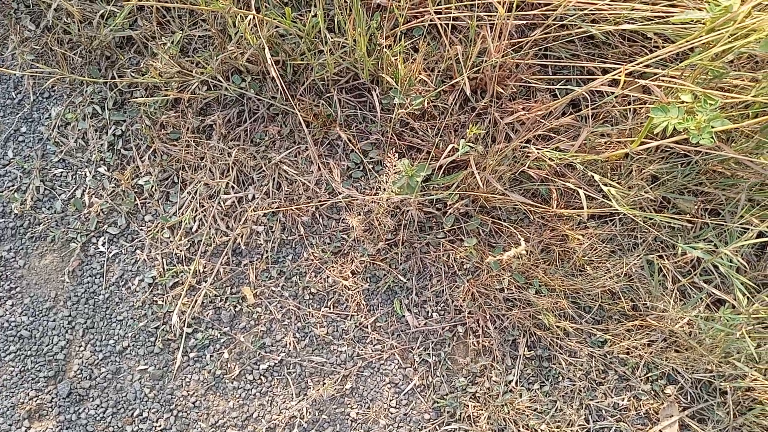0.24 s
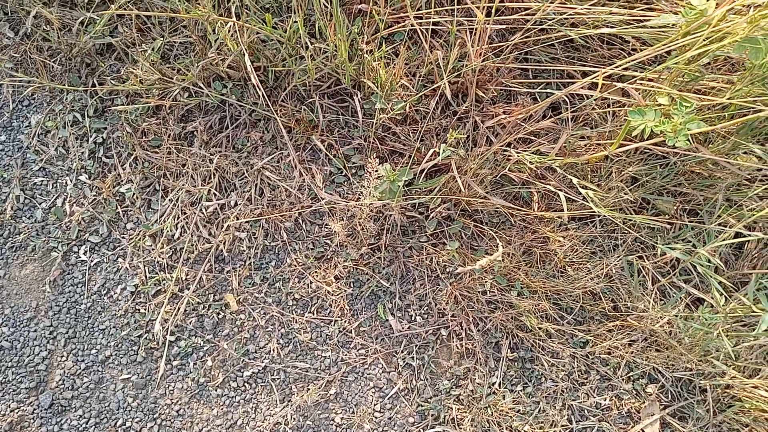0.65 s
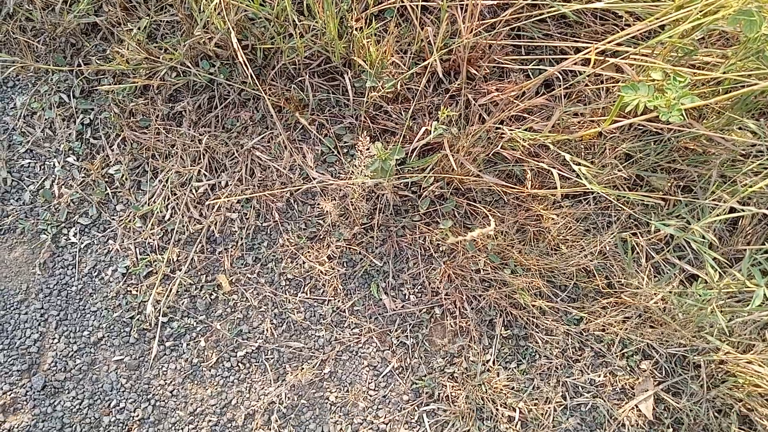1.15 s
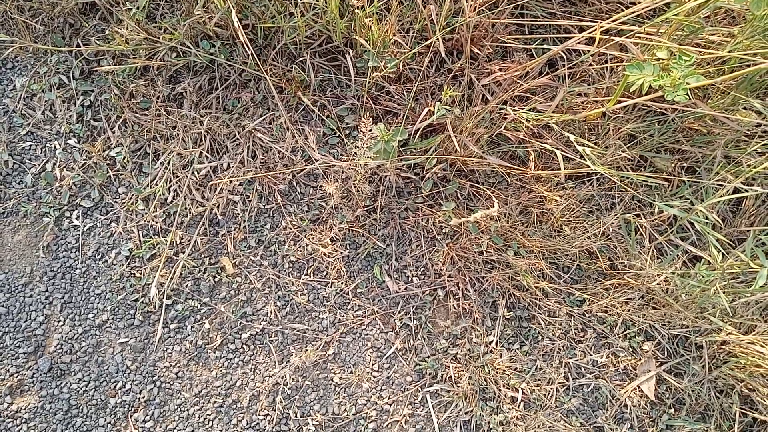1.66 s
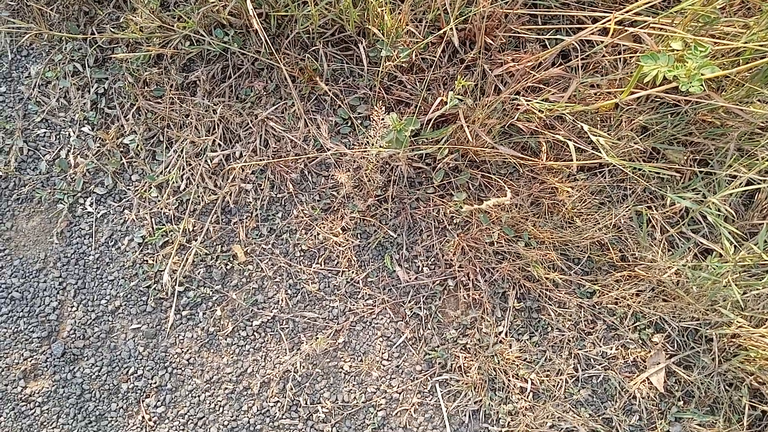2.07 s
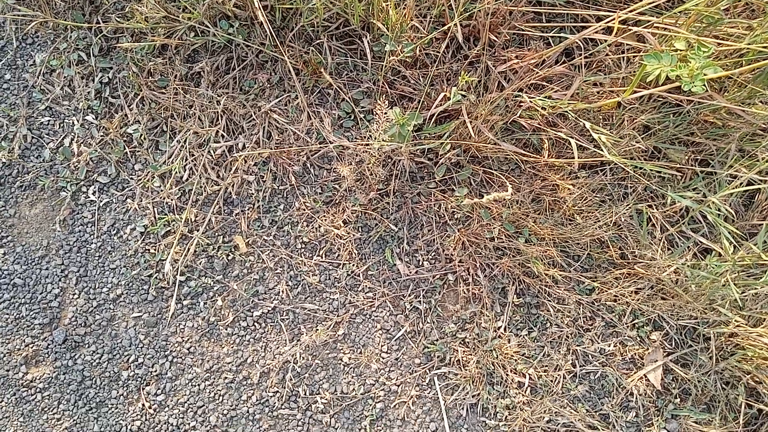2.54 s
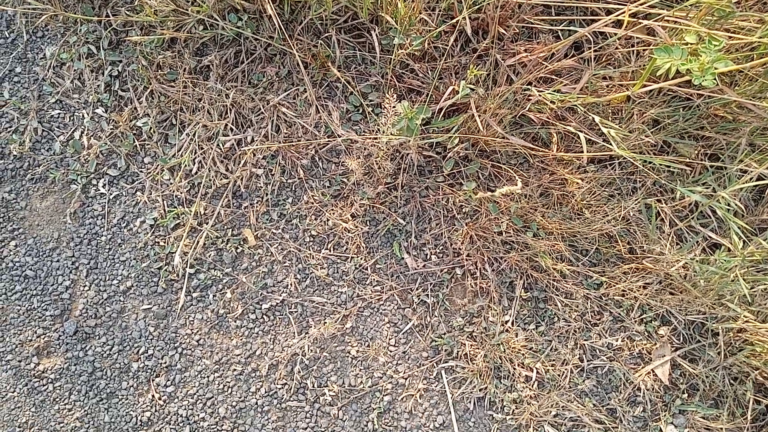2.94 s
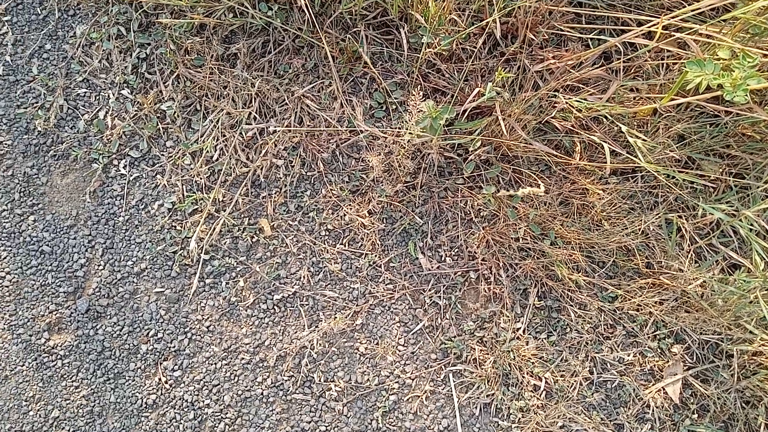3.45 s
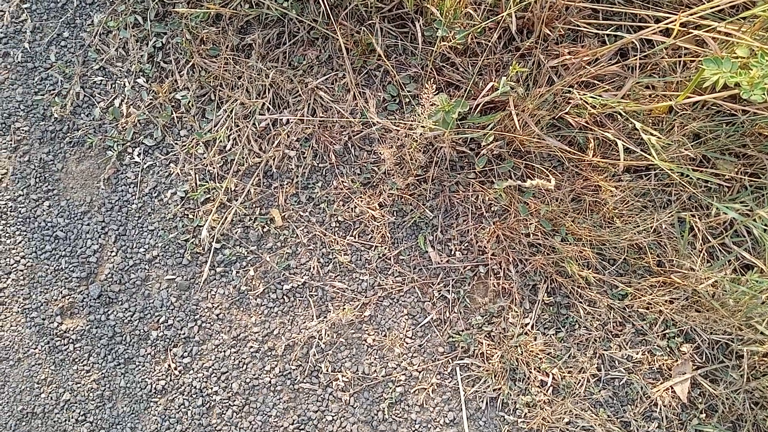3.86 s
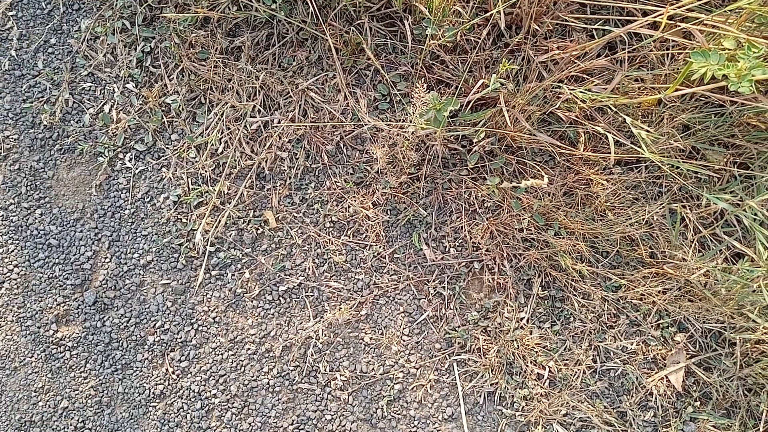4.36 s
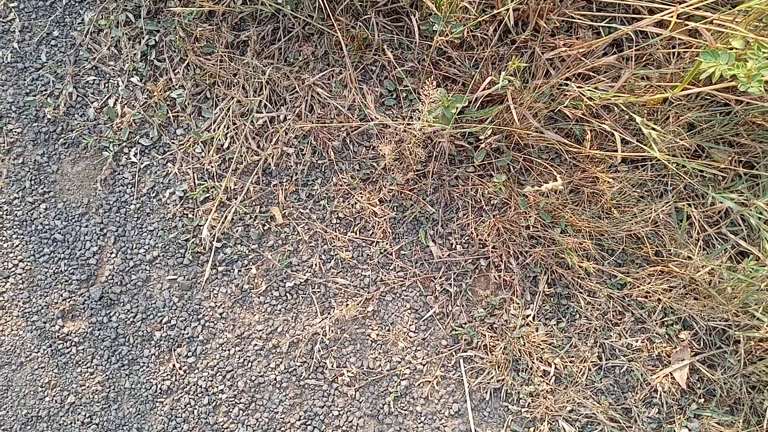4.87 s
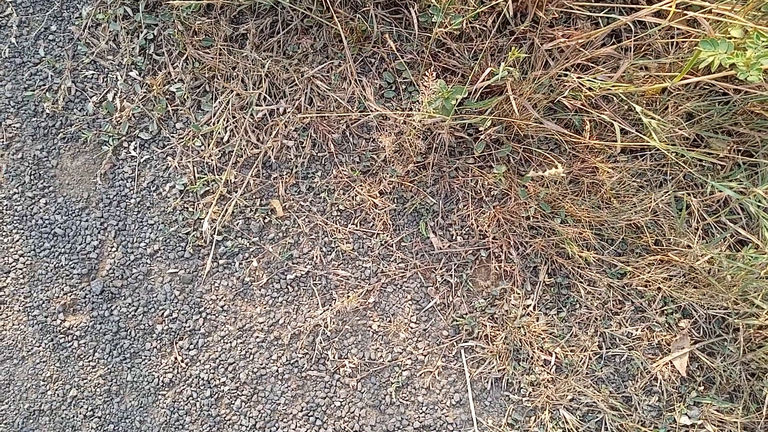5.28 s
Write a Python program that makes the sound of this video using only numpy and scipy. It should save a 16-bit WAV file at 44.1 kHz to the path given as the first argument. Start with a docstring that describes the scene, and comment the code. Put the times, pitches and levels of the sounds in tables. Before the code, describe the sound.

A hollow plastic jar snaps, knocks and clatters close by while shoes crunch gravel and dry grass outdoors, insects buzzing faintly behind.

```python
"""Gravel verge: a plastic jar is handled and set down close by; its walls snap and knock.
Each blow is a noise burst ringing resonances, with a faint scattered tail. Shoes scuff on gravel and
dry grass and a hand rubs the plastic: coloured slip grains under swells. Soft hiss and stray ticks join.
Behind: an insect buzz of rising chirps, bird chips of gliding sines, a thin wavering far whine,
and coloured noise for the low far rumble and outdoor wash."""
import sys
import numpy as np
from scipy import signal
from scipy.fft import rfft, irfft
from scipy.io import wavfile
from scipy.ndimage import uniform_filter1d

SR = 44100
rng = np.random.default_rng(int(sys.argv[2]) if len(sys.argv) > 2 else 0)


def output_pcm(signal):
    """Save a mono or channel-first signal as 16-bit PCM at the path in sys.argv[1].

    Samples are clipped to [-1, 1] before scaling.
    """
    pcm = np.clip(np.atleast_2d(signal).T, -1, 1) * 32767
    wavfile.write(sys.argv[1], SR, np.round(pcm).astype(np.int16))


N = 242991
TIME = np.arange(N) / SR  # s

# colour of grit slipping and ticking: (frequency [Hz], relative density [dB per Hz])
GRIT_COLOUR = [(300, -26), (550, -40), (780, -7), (1000, -0.5), (1280, -6), (1900, -1.5), (2400, 1),
               (3000, -1.5), (3500, -5), (4050, -12), (5000, -15.5), (6000, -12.5), (7200, -28),
               (10000, -58)]
# colour of fine hiss off the palm: (frequency [Hz], relative density [dB per Hz])
PALM_HISS_COLOUR = [(3000, -6.5), (5000, 5.5), (7200, -1.5), (9800, 1), (12000, -1), (14500, -2),
                    (16500, 1.5)]


def amp(db):
    """Decibels to amplitude factor."""
    return 10 ** (np.asarray(db) / 20)


def unit(x):
    """Scale to rms 1."""
    return x / np.sqrt(np.mean(x ** 2) + 1e-20)


def add(mix, start_s, sound):
    """Mix sound in place at start_s, cut at the end of mix."""
    part = mix[max(round(start_s * SR), 0):][:len(sound)]
    part += sound[:len(part)]


def colour(x, points):
    """Filter x by (Hz, dB) points, interpolated over log frequency; rms 1."""
    point_hz, point_db = np.transpose(points)
    hz = np.fft.rfftfreq(len(x), 1 / SR)
    gain = amp(np.interp(np.log(hz + 1), np.log(point_hz), point_db))
    return unit(irfft(rfft(x) * gain, len(x)))


def wander(per_s):
    """Random curve of rms 1: per_s new values a second, joined by straight lines."""
    return unit(np.interp(TIME * per_s, np.arange(8192), rng.standard_normal(8192)))


def band(x, edges_hz, order):
    """Causal Butterworth band-pass."""
    return signal.sosfilt(signal.butter(order, edges_hz, "bandpass", fs=SR, output="sos"), x)


def click(levels_db, spot_mode, slip_s, scatter_db=-15, scatter_s=0.01, kick=6.7):
    """A kick and a quick run of tiny slips excite the jar's walls; the ground scatters a short tail."""
    # thud, hollow body, crack, bright edge: (low edge [Hz], high edge [Hz])
    registers = [(150, 520), (740, 1500), (1700, 3850), (4100, 16000)]
    # broad and narrow jar resonances: (nominal frequency [Hz], gain over bare click [dB], t60 [s])
    jar_modes = [(214, 18.5, 0.13), (312, 5.5, 0.0087), (662, 16, 0.053), (880, 5, 0.027), (1040, 4, 0.012),
                 (1393, 3, 0.17), (1780, 7.5, 0.0099), (2080, 3.5, 0.019), (2386, 11, 0.005),
                 (2500, 1, 0.13), (2950, 7, 0.0053), (3300, 2, 0.041), (4160, 13, 0.036), (4440, 5, 0.017),
                 (5380, 18.5, 0.0024)]
    t = np.arange(8192) / SR
    slip_fade = np.exp(-t / slip_s)
    scatter_fade = amp(scatter_db) * np.exp(-t / scatter_s)
    push = rng.standard_normal(len(t)) * (slip_fade + scatter_fade)
    push[0] += kick

    ring = np.zeros(len(t))
    for hz, gain_db, t60_s in [*jar_modes, spot_mode]:
        fade = np.exp(-np.log(1000) * t / t60_s)
        detune = rng.uniform(.985, 1.015)  # the grip shifts each mode a little
        ring += amp(gain_db) * 2 * fade / fade.sum() * np.cos(2 * np.pi * hz * detune * t)
    sound = push + signal.fftconvolve(push, ring)[:len(t)]

    # where and how hard the wall is struck sets the share of each register
    blow = np.zeros(len(t))
    level_samples = round(.01 * SR)  # levels are rms over the first 10 ms
    for level_db, edges_hz in zip(levels_db, registers):
        part = band(sound, edges_hz, order=4)
        blow += amp(level_db) * part / np.std(part[:level_samples])
    return blow


def snaps(thud_db=-22.5, body_db=-12, slip_s=0.0027, spot_db=18, spot_t60_s=.015):
    """Wall snaps or stone cracks: too quick to move the hollow body much, so mostly crack and edge."""
    # (time [s], crack level [dB], bright edge over crack [dB], nominal ring of struck spot [Hz])
    snap_events = [(0.305, -50, -3.5, 2530), (0.424, -42.5, -16, 2400), (0.4865, -36.5, -4.5, 2430),
                   (0.5, -38.5, -1.5, 3730), (0.5495, -34, -13.5, 3550), (0.6908, -45.5, -0.5, 2880),
                   (0.7751, -41.5, -11.5, 2900), (0.8138, -45, -10, 2670), (0.8846, -49, -5, 2800),
                   (1.0246, -45.5, -2.5, 2630), (1.564, -19.5, -10, 2460), (1.5743, -18.5, -8, 2330),
                   (1.7955, -26, -8, 2680), (1.7995, -31.5, -12, 2270), (1.9125, -31.5, -33, 2340),
                   (1.932, -36, -24, 2630), (1.9719, -24, -5, 2120), (2.1004, -50, 4.5, 5800),
                   (2.9141, -48.5, -10, 3060), (3.083, -56, -20, 2600), (3.125, -49.5, -22, 2350),
                   (3.179, -49.5, -19, 2700), (3.208, -52, -18, 2530), (3.299, -47, -6, 2900),
                   (3.3566, -15.5, -18.5, 2290), (3.3934, -22.5, -10.5, 2600), (3.453, -35, -9, 2420),
                   (3.475, -37, -5, 2600), (3.514, -29.5, -12, 2770), (3.5286, -27, -10, 1550),
                   (3.824, -37.5, 2, 3430), (3.9022, -19.5, -17, 2070), (3.905, -11, -7.5, 2550),
                   (4.953, -29.5, -9.5, 2840)]
    out = np.zeros(N)
    for start_s, level_db, edge_db, spot_hz in snap_events:
        levels_db = level_db + np.array([thud_db, body_db, 0, edge_db])
        add(out, start_s, click(levels_db, (spot_hz, spot_db, spot_t60_s), slip_s))
    return out


def knocks(edge_over_crack_db=-18, slip_s=.0024, spot_db=24.5, spot_t60_s=0.032):
    """Duller knocks, with more hollow body and thud, set a larger panel ringing for longer."""
    # (time [s], body level [dB], thud over body [dB], crack over body [dB], nominal ring of spot [Hz])
    knock_events = [(0.3444, -50, -10, -2, 1050), (0.6254, -48, -4.5, -4.5, 1030),
                    (1.0238, -48, -18, -0.5, 1000), (1.066, -53, -5, 3.5, 970), (1.7003, -52, -2, 2, 810),
                    (2.0019, -26.5, -25, -4, 1070), (2.0638, -37.5, -1, 0.5, 1006),
                    (2.078, -42.5, -1, -2, 785), (2.4403, -47, 8.5, -3.5, 720),
                    (2.5734, -40.5, 0, -4.5, 760), (2.6716, -51, -14, -0.5, 960), (2.868, -47, 4, -10, 680),
                    (2.879, -52, 10, -8, 608), (3.2359, -38, -28, -2.5, 973), (3.2645, -41, -4, 1.5, 964),
                    (3.285, -38, -2.5, -3.5, 950), (3.3445, -33, -8, 1.5, 1900),
                    (3.3841, -39.5, 7.5, -17, 840), (3.5016, -28, -0.5, -10, 940),
                    (3.533, -26.5, -6.5, -10, 980), (3.718, -39, -17, 1.5, 840),
                    (3.823, -32.5, -13, -4, 750), (4.4605, -47.5, -24, -4, 1110),
                    (4.6647, -36, 1.5, 4, 980), (4.686, -38.5, -7, -1, 1030), (4.957, -36, 2.5, 0.5, 210)]
    out = np.zeros(N)
    for start_s, level_db, thud_db, crack_db, spot_hz in knock_events:
        levels_db = level_db + np.array([thud_db, 0, crack_db, crack_db + edge_over_crack_db])
        add(out, start_s, click(levels_db, (spot_hz, spot_db, spot_t60_s), slip_s))
    return out


def verge(x, level_db=-33.5, t60_s=.7, low_hz=500, high_hz=14000):
    """Ground and weeds scatter a faint tail: convolution with band-limited decaying noise."""
    t = np.arange(SR) / SR
    tail = band(rng.standard_normal(SR), (low_hz, high_hz), order=1) * amp(-60 * t / t60_s)
    return amp(level_db) * signal.fftconvolve(x, tail / np.linalg.norm(tail))[:N]


def grains(per_s, spread_db, smooth):
    """Tiny slips of uneven size over a share of smooth friction noise."""
    size_db = spread_db * np.minimum(rng.exponential(1, N), 4)
    size = amp(size_db) * rng.choice([-1, 1], N)
    slips = unit(size * (rng.random(N) < per_s / SR))
    return slips + smooth * rng.standard_normal(N)


def pebbles(per_s, spread_db, ring_s):
    """Short decaying noise ticks of uneven size at random moments; rms 1."""
    t = np.arange(1024) / SR
    tick = rng.standard_normal(len(t)) * np.exp(-t / ring_s)
    return unit(signal.fftconvolve(grains(per_s, spread_db, smooth=0), tick)[:N])


def patchy(x, depth_db, count_frames, count_bins):
    """Contact points change from moment to moment: smoothed random gains keep shifting the colour."""
    spectra = signal.stft(x, nperseg=256)[2]
    patches = uniform_filter1d(rng.standard_normal(spectra.shape), count_frames, 1)
    patches = uniform_filter1d(patches, count_bins, 0)
    return signal.istft(spectra * amp(depth_db * unit(patches)), nperseg=256)[1][:N]


def swell(peak_s, rise_s, fall_s, shape=1.43):
    """Pressure builds up to peak_s and lets go; shape 1 is pointed, 2 rounded."""
    width_s = np.where(TIME < peak_s, rise_s, fall_s)
    return np.exp(-(abs(TIME - peak_s) / width_s) ** shape)


def friction(strokes):
    """Power of hollow rub, grit and fine hiss under a series of strokes."""
    powers = np.zeros((3, N))
    for peak_s, rise_s, fall_s, level_db, hollow_db, hiss_db in strokes:
        levels_db = level_db + np.array([hollow_db, 0, hiss_db])
        powers += np.outer(amp(levels_db), swell(peak_s, rise_s, fall_s)) ** 2
    return powers


def coloured_layers(slips, powers, colours):
    """Sum of the same slips in several colours, each following its own power curve."""
    return sum(np.sqrt(power) * colour(slips, points) for power, points in zip(powers, colours))


def scuffs(judder_db=0.77, pebbles_db=-7, swing_db=1.45, rustle_hollow_db=-4, rustle_hiss_db=-7):
    """Grit slips under the shoes and pebbles catch; between strokes the grass keeps rustling."""
    # (peak [s], rise [s], fall [s], grit level [dB], hollow rub over grit [dB], fine hiss over grit [dB])
    shoe_strokes = [(0.01, 0.037, 0.095, -49.5, -12, -4), (0.18, 0.049, 0.015, -51.5, -9, -16),
                    (0.44, .02, 0.034, -42, -6, -16), (0.497, 0.038, 0.034, -40, -14, -7),
                    (0.65, 0.018, 0.022, -50, -6, -5), (0.69, 0.019, 0.019, -47.5, -7.5, -9),
                    (0.845, 0.077, .055, -47.5, -6, -12), (1.755, 0.023, 0.053, -41, -8, -10.5),
                    (1.885, 0.046, 0.077, -35, -5, -10.5), (3.33, 0.087, 0.16, -50, -2, -14),
                    (3.468, 0.015, 0.047, -36.5, -1.5, -11), (3.545, 0.098, .07, -33.5, -4, -9),
                    (3.722, 0.1, 0.056, -42, -9, -8), (3.825, 0.068, 0.046, -36.5, -9, -6),
                    (4.06, 0.029, .02, -53, 0, -10), (4.295, .025, .025, -55, -9, -14),
                    (4.61, 0.05, 0.11, -46, -14, -9.5), (4.688, 0.046, 0.096, -42.5, -11.5, -14.5),
                    (5.333, .01, 0.029, -42, -11.5, -6.5), (5.448, 0.015, .028, -49.5, -5, -5)]
    # grass rustle: (time [s], grit level before swing [dB])
    rustle_levels = [(0, -62), (0.6, -65.5), (1.2, -62), (1.5, -58.5), (2.45, -65.5), (3.1, -60.5),
                     (4.2, -61.5), (4.9, -71), (5.5, -61)]
    # hollow rub: (frequency [Hz], relative density [dB per Hz])
    rub_colour = [(40, -71), (110, -7.5), (200, 4.5), (330, -2.5), (500, -13.5), (700, -5.5), (870, -6),
                  (1040, -16), (1300, -45), (2000, -41)]
    # fine hiss: (frequency [Hz], relative density [dB per Hz])
    hiss_colour = [(3000, -0.5), (5000, 8), (7200, 0.5), (8300, -2), (9800, 1), (12000, -0.5), (14500, -9),
                   (16500, -4.5)]
    slips = grains(per_s=3500, spread_db=3.0, smooth=0.69)
    slips = unit(slips * amp(judder_db * wander(per_s=280)))
    slips = slips + amp(pebbles_db) * pebbles(per_s=90, spread_db=1.8, ring_s=0.0013)
    slips = patchy(slips, depth_db=2.2, count_frames=10, count_bins=2)
    rustle_db = np.interp(TIME, *np.transpose(rustle_levels)) + swing_db * wander(per_s=12)
    rustle_powers = np.outer(amp([rustle_hollow_db, 0, rustle_hiss_db]), amp(rustle_db)) ** 2
    powers = friction(shoe_strokes) + rustle_powers
    return coloured_layers(slips, powers, (rub_colour, GRIT_COLOUR, hiss_colour))


def rubs():
    """Skin slips on plastic in finer, more even grains than grit."""
    # (peak [s], rise [s], fall [s], grit level [dB], hollow rub over grit [dB], fine hiss over grit [dB])
    hand_strokes = [(1.087, 0.011, 0.017, -52, 6, -3), (2.09, 0.06, .04, -49, -3, -5),
                    (2.167, 0.025, 0.016, -36, -7.5, -3), (2.304, 0.0098, 0.017, -33.5, 1, -1.5),
                    (2.334, 0.023, .018, -33, -1, -.5), (2.572, 0.014, 0.012, -48.5, -15, -3),
                    (2.635, 0.025, 0.014, -51.5, -6, -7), (2.794, 0.022, 0.024, -35.5, -1, 1.5),
                    (2.868, 0.0053, 0.016, -42, 3.5, -18), (2.995, 0.01, 0.017, -44.5, 3, -10.5)]
    # hollow rub: (frequency [Hz], relative density [dB per Hz])
    palm_rub_colour = [(40, -77), (110, -5), (200, 4.5), (330, -3.5), (500, -11), (700, -7.5), (870, -8),
                       (1040, -11), (1300, -32), (2000, -60)]
    # grain of the slips: (frequency [Hz], relative density [dB per Hz])
    palm_grit_colour = [(300, -32), (550, -30), (780, -4.5), (1000, -3.5), (1280, -7.5), (1900, -2.5),
                        (2400, 0.5), (3000, 0), (3500, -3), (4050, -12), (5000, -14), (6000, -8.5),
                        (7200, -26), (10000, -62)]
    slips = grains(per_s=5000, spread_db=2.0, smooth=1.1)
    slips = patchy(slips, depth_db=2, count_frames=6, count_bins=3)
    colours = (palm_rub_colour, palm_grit_colour, PALM_HISS_COLOUR)
    return coloured_layers(slips, friction(hand_strokes), colours)


def soft_hiss():
    """Smooth high noise that swells and fades."""
    # (peak [s], rise [s], fall [s], level [dB])
    hiss_swells = [(1.11, .06, 0.11, -70), (1.48, 0.47, .12, -60.5), (3.22, 0.18, .15, -63.5)]
    level = np.zeros(N)
    for peak_s, rise_s, fall_s, level_db in hiss_swells:
        level += amp(level_db) * swell(peak_s, rise_s, fall_s)
    return level * colour(rng.standard_normal(N), PALM_HISS_COLOUR)


def stalks(level_db=-68):
    """Stray faint ticks of dry stalks and loose stones."""
    return amp(level_db) * colour(pebbles(per_s=8, spread_db=1.5, ring_s=0.00071), GRIT_COLOUR)


def insect(level_db=-61.5, low_hz=5400, high_hz=6450, strokes_per_s=73, waver_hz=110, blur=.8):
    """Each wing stroke is a short rising chirp; the weeds smear it into a narrow buzz."""
    stroke_rate_hz = strokes_per_s * (1 + 0.0373 * wander(per_s=30))
    stroke = np.cumsum(stroke_rate_hz) / SR % 1  # phase 0..1
    hz = low_hz + (high_hz - low_hz) * stroke + waver_hz * wander(per_s=700)
    chirps = np.sqrt(np.sin(np.pi * stroke)) * np.sin(2 * np.pi * np.cumsum(hz) / SR)
    t = np.arange(4096) / SR
    scatter = rng.standard_normal(len(t)) * np.exp(-t / 0.035)
    smear = signal.fftconvolve(chirps, scatter)[:N]
    return amp(level_db) * unit(unit(chirps) + blur * unit(smear))


def bird():
    """Chips and thin whistles: sines that glide quickly, then level off."""
    # (time [s], length [s], start pitch [Hz], end pitch [Hz], peak level [dB])
    chips = [(0.828, 0.058, 3230, 3220, -47.5), (2.422, 0.048, 4450, 4250, -61),
             (3.153, 0.022, 3800, 4200, -49), (3.18, 0.016, 4750, 4250, -52),
             (3.254, 0.027, 3650, 4100, -54)]
    out = np.zeros(N)
    for start_s, length_s, start_hz, end_hz, level_db in chips:
        progress = np.linspace(0, 1, round(length_s * SR))
        hz = end_hz + (start_hz - end_hz) * (1 - progress) ** 2
        tone = np.sin(2 * np.pi * np.cumsum(hz) / SR)
        add(out, start_s, amp(level_db) * np.sin(np.pi * progress) * tone)
    return out


def whine(hz=945, waver_hz=14, swing_db=3.2):
    """Thin far sine, unsteady in pitch and level, like tyres on a road."""
    # (time [s], peak level before swing [dB])
    whine_levels = [(0, -72), (.95, -73), (1.2, -60.5), (1.65, -72), (2.4, -59), (2.8, -81), (5.5, -78)]
    turns = np.cumsum(hz + waver_hz * wander(per_s=130)) / SR
    level_db = np.interp(TIME, *np.transpose(whine_levels)) + swing_db * wander(per_s=23)
    return amp(level_db) * np.sin(2 * np.pi * turns)


def air(level_db=-51):
    """Far rumble and a faint outdoor wash: steady coloured noise."""
    # (frequency [Hz], relative density [dB per Hz])
    air_colour = [(20, -37), (35, -27), (50, -7), (100, 4.5), (150, -2.5), (200, -6.5), (330, -14.5),
                  (550, -22), (950, -23.5), (1350, -24), (2400, -22.5), (4000, -31), (7500, -40.5),
                  (16000, -39.5)]
    return amp(level_db) * colour(rng.standard_normal(N), air_colour)


def scene():
    """Sum of the jar with its scattered tail, the friction layers and the background; one channel."""
    jar = snaps() + knocks()
    near = jar + verge(jar) + scuffs() + rubs() + soft_hiss() + stalks()
    far = insect() + bird() + whine() + air()
    return (near + far)[None]


def record(dry, ceiling=.85, edge_hz=16200):
    """Soft saturation rounds off the sharpest peaks; then a linear-phase low-pass."""
    rounded = ceiling * np.tanh(dry / ceiling)
    low_pass = signal.firwin(301, edge_hz, window=("kaiser", 9), fs=SR)
    return signal.oaconvolve(rounded, low_pass[None], "same")


dry = scene()
out = record(dry)
output_pcm(out)
```